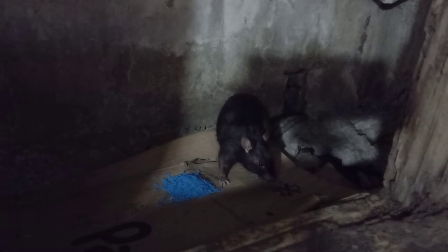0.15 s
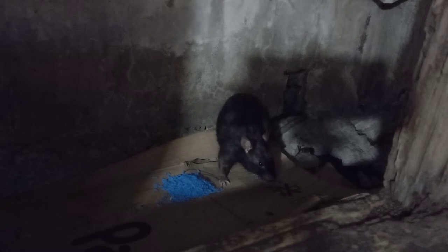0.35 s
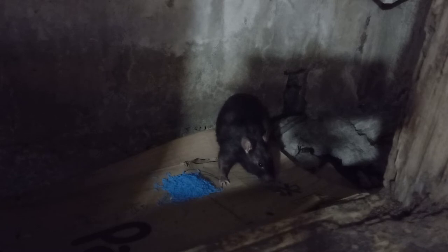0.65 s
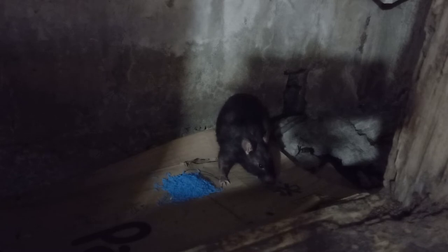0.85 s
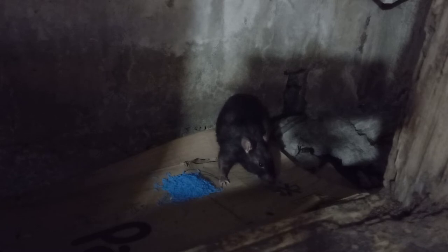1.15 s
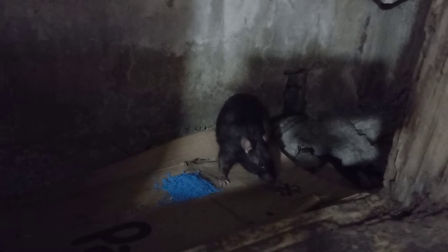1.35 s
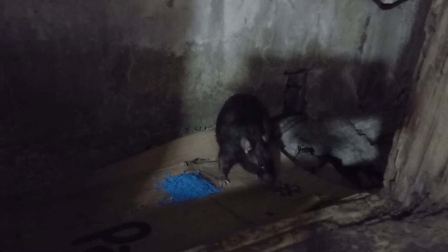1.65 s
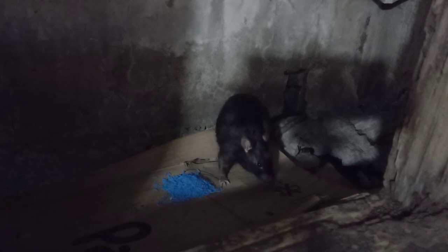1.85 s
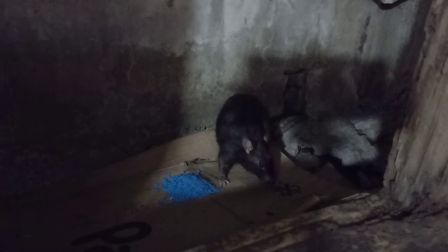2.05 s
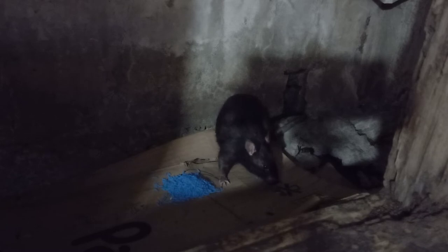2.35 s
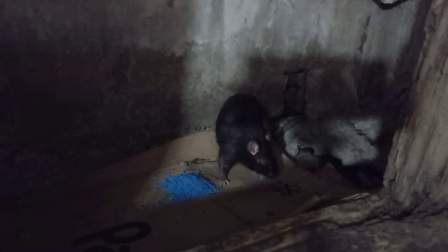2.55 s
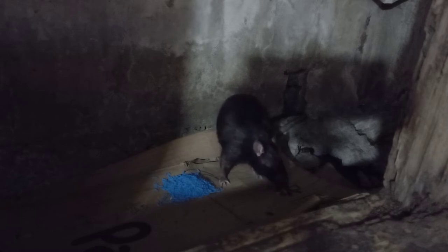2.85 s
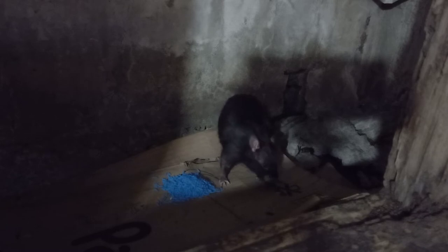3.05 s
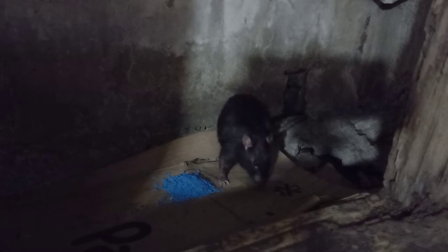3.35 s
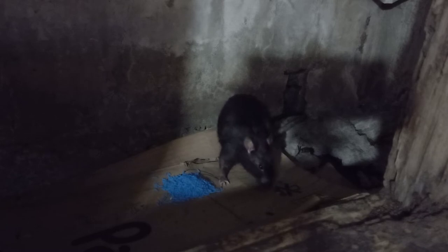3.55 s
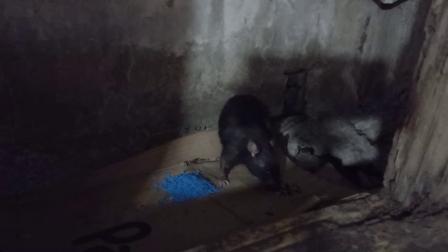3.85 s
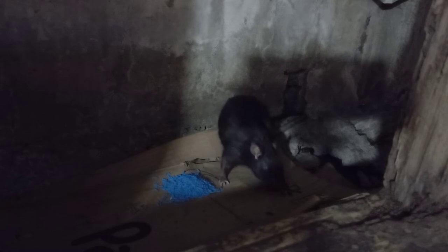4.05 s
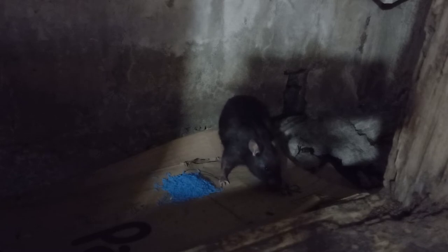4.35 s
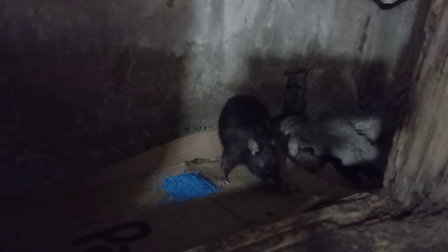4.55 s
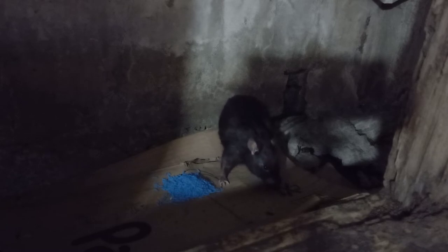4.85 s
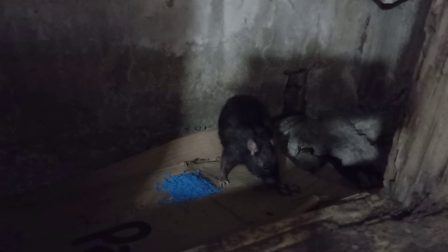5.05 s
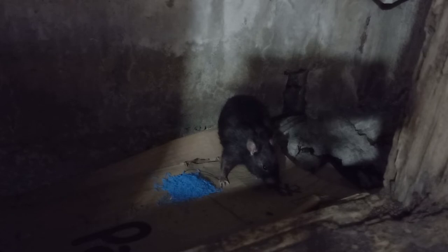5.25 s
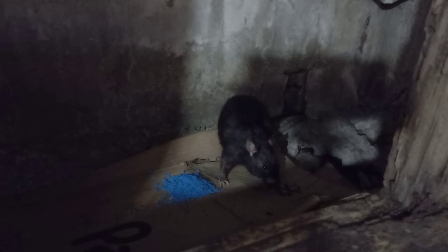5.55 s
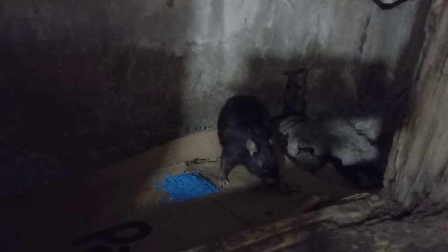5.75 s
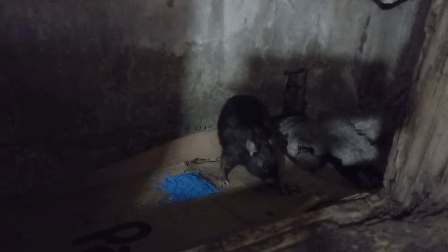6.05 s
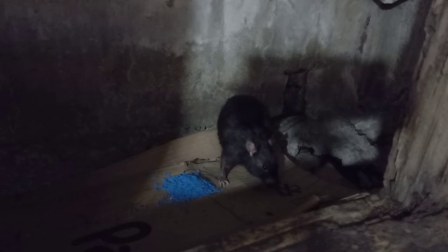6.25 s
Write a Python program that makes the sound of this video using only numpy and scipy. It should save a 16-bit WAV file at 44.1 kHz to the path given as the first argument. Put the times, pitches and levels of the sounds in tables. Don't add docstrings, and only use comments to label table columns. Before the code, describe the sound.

A steady low mains hum with buzzing overtones, wavering fan and shaft tones, and dull rumble through the wall fill a bare indoor corner for about six and a half seconds, with faint airy hiss. At the very start comes a muffled bump, then a small scrape of teeth and one distant rubbing squeak around 0.1 seconds, swelling, slipping and fading by about 0.4. A rat close by, slightly right, cracks a pellet at 0.5, then sharply at 1.5 and 1.6, and more softly at 2.0 and 2.2. Tiny paired nibbling clicks continue from 2.3 to 5. Soft far bumps fall near 0.5, 0.9, 2.8, 3.1 and 4.0; a heavy deep boom with a sliding rustle lands at 5.15. Another crack comes at 5.4, a dull bump at 5.8, a bright snap at 6.0 and a lesser one at 6.2, each with short echo.

```python
import sys
import numpy as np
from scipy import signal
from scipy.fft import rfft, irfft, next_fast_len
from scipy.io import wavfile
from scipy.ndimage import uniform_filter1d, map_coordinates

SR = 44100
rng = np.random.default_rng(int(sys.argv[2]) if len(sys.argv) > 2 else 0)


def amplitude_ratio(level_db):
    exponent = np.asarray(level_db, float) / 20
    return 10 ** exponent


def output_pcm(signal):
    pcm = np.clip(np.atleast_2d(signal).T, -1, 1) * 32767
    wavfile.write(sys.argv[1], SR, np.round(pcm).astype(np.int16))


N = 282240


def unit(x):
    return x / np.sqrt(np.mean(x ** 2) + 1e-20)


def along(points, hz):
    f, v = np.transpose(points)
    return np.interp(np.log(hz + 1), np.log(f + 1), v)


def wobble(rate_hz):
    knots = rng.standard_normal(int(N * rate_hz / SR) + 4)
    return map_coordinates(knots, [np.arange(N) * rate_hz / SR])


def filtered(x, response):
    n = x.shape[-1]
    m = next_fast_len(n + 4096)
    return irfft(rfft(x, m) * response(np.fft.rfftfreq(m, 1 / SR)), m)[..., :n]


def band(hz, width_hz):
    return lambda f: 1j * f * width_hz / (hz * hz - f * f + 1j * f * width_hz)


def add(track, start_s, sound):
    at = max(round(start_s * SR), 0)
    track[..., at:at + sound.shape[-1]] += sound[..., :track.shape[-1] - at]


def tail(decays, length_s):
    noise = rng.standard_normal((2, int(length_s * SR)))
    hz, t, z = signal.stft(noise, SR, nperseg=128)
    decay = amplitude_ratio(-60 * t / along(decays, hz)[:, None])
    x = signal.istft(z * decay, SR, nperseg=128)[1]
    return x / np.linalg.norm(x[0])


def tones(rows):
    hz, db, pan_db, lead = np.transpose(rows)
    m = 1 << 19
    z = np.zeros((2, m // 2 + 1), complex)
    side = np.array([[.5], [-.5]])
    phase = 2 * np.pi * rng.random(len(hz))
    mean_power = np.mean(amplitude_ratio(2 * side * pan_db), axis=0)
    share = amplitude_ratio(side * pan_db) / np.sqrt(mean_power)
    bins = np.round(hz * m / SR).astype(int)
    z[:, bins] = amplitude_ratio(db) * share * np.exp(1j * (phase + side * lead))
    return irfft(z, m)[:, :N] * m / np.sqrt(2)


def series(hz, count, levels, spread_db, apart):
    f = hz * np.arange(1, count + 1)
    u = rng.standard_normal((count, 3))
    db = along(levels, f) + spread_db * u[:, 0]
    return np.array([f, db, 5 * apart * u[:, 1], 2 * apart * u[:, 2]]).T


def hum():
    # order, rms level/dB, left-right/dB, left lead/rad
    buzz = [(2, -42, -1, 0.0), (6, -48, 2, 0.5), (10, -64, 10, 2.1), (14, -69, 2, 2.2),
            (18, -66, -11, -1.2), (22, -60, 2, -3.0), (26, -62, 6, -1.2), (30, -71, 14, -0.9),
            (34, -71, 5, 1.9), (38, -73, 6, 1.0), (42, -82, 4, -1.8), (50, -81, -8, -0.5),
            (54, -81, -7, 2.1), (70, -82, 9, 0.3)]
    # order, rms level/dB, left-right/dB, left lead/rad
    winding = [(21, -71, 1, 2.7), (25, -75, 11, -0.9), (27, -76, 1, 0.7), (29, -78, 6, -2.7),
               (35, -79, -3, -2.7)]
    # f/Hz, rms level/dB
    faint_levels = [(600, -84), (2000, -85), (3100, -89), (3550, -102), (4200, -91), (6000, -101),
                    (8000, -106), (9000, -130)]
    mains_hz = 59.946
    strong = np.array([(round(k) * mains_hz, db + k / 28, pan_db, lead)
                       for k, db, pan_db, lead in [*buzz, *winding]])
    faint = series(mains_hz, count=150, levels=faint_levels, spread_db=3, apart=1)
    low = tones(strong[:2])
    high = tones(np.vstack([faint, strong[2:]]))
    turn = 2 * np.pi * mains_hz / 8 * np.arange(N) / SR
    throb = 1 + .2 * np.cos(turn) + .08 * np.cos(2 * turn + 1)
    return low * amplitude_ratio(.3 * wobble(2.5)) + high * throb * amplitude_ratio(0.9 * wobble(5))


def motors():
    # f/Hz, rms level/dB, left-right/dB, left lead/rad
    shafts = [(55.5, -72, -2, 0.0), (56.9, -64, 1, 0.1), (58.5, -68, 1, 0.1), (65.5, -60, 1, 0.1),
              (99.0, -60, -1, -0.1), (111.6, -53, 0, 0.0), (287.7, -60, 0, 0.2), (425.8, -68, -2, -0.5),
              (444.0, -66, 0, -0.4), (814.4, -74, -1, -1.4), (872.6, -77, 0, -2.8), (930.7, -77, -4, 3.0),
              (1218.0, -71, 0, -0.9), (1276.0, -73, -7, -0.3)]
    # f/Hz, rms level/dB
    blade_levels = [(40, -80), (90, -68), (170, -66), (350, -68), (450, -69), (520, -69), (650, -78),
                    (800, -84), (1000, -100)]
    unsteady = sum(tones([row]) * amplitude_ratio(0.76 * wobble(1.63)) for row in shafts[:7])
    steady = tones(shafts[7:])
    blades = tones(series(18.506, count=50, levels=blade_levels, spread_db=2.5, apart=.25))
    return unsteady + steady + blades * amplitude_ratio(1.5 * wobble(1.5))


def air():
    # f/Hz, density/dB per Hz
    rumble_colour = [(25, -46), (45, -31), (56, -7.5), (70, 1), (110, 1), (135, -2.5), (240, -3.5),
                     (290, -9.5), (360, -4.5), (520, -9.5), (650, -19), (900, -34), (1500, -51)]
    # f/Hz, density/dB per Hz
    air_colour = [(25, -23), (50, -22), (70, 7), (300, -1.5), (600, -3), (950, -3), (1450, -3), (1700, -9),
                  (2100, -10), (2600, -20), (6000, -23.5), (14500, -28.5), (15350, -26), (15600, -66)]
    rumble = amplitude_ratio(-48) * unit(filtered(rng.standard_normal(N), lambda f: amplitude_ratio(along(rumble_colour, f))))
    room = amplitude_ratio(-55.0) * unit(filtered(rng.standard_normal((2, N)), lambda f: amplitude_ratio(along(air_colour, f))))
    hiss = filtered(room, lambda f: np.clip(f / 2500 - 1, 0, 1))
    rumble = rumble * amplitude_ratio([[-.3], [.3]] + .8 * wobble(3))
    murmur = (room - hiss) * amplitude_ratio(.9 * wobble(6))
    return rumble + murmur + hiss * amplitude_ratio(.4 * wobble(8) + .3 * wobble(1.2))


def held(x, envelope):
    return x * envelope / np.sqrt(np.mean((x * envelope) ** 2) / np.mean(envelope ** 2))


def swell(t, rise_s, t60_s):
    shape = np.minimum(t / rise_s, 1) ** 2 * amplitude_ratio(-60 * np.maximum(t - rise_s, 0) / t60_s)
    lumps = unit(uniform_filter1d(rng.standard_normal(len(t)), 300))
    return shape * amplitude_ratio(1.2 * lumps)


def rustle(envelope):
    colour = lambda f: amplitude_ratio(along([(1500, -15), (2800, -9.5), (6000, 2.0), (10000, 0.0), (15000, -7)], f))
    return held(filtered(rng.standard_normal((2, len(envelope))), colour), envelope)


def bumps():
    # t/s, rms level/dB, centre f/Hz, rise/s, t60/s
    blows = [(.018, -45.5, 940, 0.0057, 0.62), (.495, -50, 1130, 0.012, 0.51), (.94, -44, 580, 0.039, 0.37),
             (0.954, -58.5, 1670, 0.033, 0.42), (2.84, -50.5, 605, 0.018, 0.29),
             (3.1, -50, 596, 0.023, 0.22), (4.0, -47.5, 835, 0.037, 0.37), (5.145, -41, 490, 0.012, 0.29),
             (5.156, -51, 2160, 0.029, 0.29), (5.243, -52.5, 1410, .015, 0.16), (5.25, -49, 620, 0.02, 0.4),
             (5.835, -49.5, 960, 0.028, 0.59)]
    # t/s, rms level/dB, t60/s
    scuffs = [
        (0.015, -64, .5),
        (4.005, -61, .35),
        (5.161, -49, 0.33),
        (5.242, -69, .23),
        (5.855, -75, .3),
    ]
    # t/s, level/dB, f/Hz, t60/s
    thuds = [
        (.97, -43, 257, 0.3),
        (2.851, -45.5, 239, 0.25),
        (3.118, -43, 263, 0.18),
        (5.157, -27.5, 77, 0.22),
        (5.165, -43.5, 172.7, 0.7),
    ]
    out, t = np.zeros((2, N)), np.arange(SR // 2) / SR
    for s, db, hz, rise_s, t60_s in blows:
        envelope = swell(t, rise_s, t60_s)
        shared, own = rng.standard_normal(len(t)), rng.standard_normal((2, len(t)))
        wall = band(hz, 0.91 * hz)
        body = filtered(0.86 * shared + own, lambda f: wall(f) ** 2)
        add(out, s, amplitude_ratio(db) * (held(body, envelope) + amplitude_ratio(-34) * rustle(envelope)))
    for s, db, t60_s in scuffs:
        add(out, s, amplitude_ratio(db) * rustle(swell(t, .02, t60_s)))
    for s, db, hz, t60_s in thuds:
        wander = 1.98 * np.cumsum(unit(rng.standard_normal(len(t)))) * np.sqrt(hz / SR)
        ring = np.sin(2 * np.pi * hz * t + wander)
        add(out, s, amplitude_ratio(db - 60 * t / t60_s) * np.minimum(t / 0.013, 1) * ring[None])
    return out


def bites():
    # t/s, peak level/dB, tooth ring over the rest/dB, jaw knock/dB
    cracks = [(0.0192, -53, -2, 3), (0.5199, -35.5, 3, -18), (1.4687, -30.5, 9.5, -9),
              (1.635, -32.5, 16, -4.5), (2.0234, -39, -1.5, -4.5), (2.217, -51, -2, 3),
              (2.2412, -44, 9, -9), (3.255, -53.5, -3, 8), (3.8087, -46, -0.5, -16),
              (5.435, -39, -1.5, -10), (6.006, -31, 2.5, -26), (6.2268, -41, -3, -12)]
    # t/s, peak level/dB
    nibbles = [(.3371, -62), (2.2843, -56), (2.5037, -61), (2.5252, -62), (2.724, -53.5), (2.7616, -53.5),
               (3.034, -51), (3.0724, -54), (3.5274, -61), (3.5486, -51.5), (3.7888, -57), (4.136, -56),
               (4.9147, -56), (4.942, -54), (4.9631, -61), (6.003, -65)]
    # t/s, peak level/dB, part levels/dB, crumble/s
    scrape = (0.11, -41.5, (-27, -1, 0.5, 4), 0.13)
    # f/Hz, width/Hz
    resonances = [
        (1350, 740),
        (4300, 3200),
        (8300, 3400),
        (13000, 5100),
    ]
    # f/Hz, t60/s
    corner = [(1000, 0.36), (4000, 0.26), (9000, 0.089), (15000, 0.46)]
    events = [scrape]
    events += [(s, db, (jaw_db, -ring_db, 0, -2.5 - 0.65 * ring_db), 0.0061) for s, db, ring_db, jaw_db in cracks]
    events += [(s, db, (-13, 0, 3.5, -6), 0.016) for s, db in nibbles]
    out, t = np.zeros((2, N)), np.arange(SR // 8) / SR
    for s, db, levels_db, crumble_s in events:
        crumble_s = max(crumble_s, .001)
        grit = rng.standard_normal((2, len(t))) * amplitude_ratio(4.3 * rng.standard_normal(len(t)))
        grit = np.array([0.73 * grit[1] + 0.86 * grit[0], grit[1]])
        burst = grit * (amplitude_ratio(-60 * t / crumble_s) + amplitude_ratio(-8 - 60 * t / 0.035))
        burst[:, 0] = 0.038 / crumble_s
        snap = np.zeros_like(burst)
        for k, (part_db, (hz, width_hz)) in enumerate(zip(levels_db, resonances)):
            part = filtered(burst, lambda f: band(hz, width_hz)(f) ** 2)
            snap += (-1) ** k * amplitude_ratio(db + 12.5 + part_db) * part / np.linalg.norm(part[1, :SR // 300])
        shade = filtered(snap[0], lambda f: amplitude_ratio(along([(2000, 5.0), (4000, -3.0), (8000, -9)], f)))
        add(out, s, np.array([shade, np.roll(snap[1], 4)]))
        echo = signal.fftconvolve(snap[1:], tail(corner, .25), axes=1)
        add(out, s + 0.0016, amplitude_ratio([[-8], [-4.5]]) * echo)
    return out


def squeak():
    # level under full load/dB, growth with load, level in the last drag/dB
    overtones = [
        (-21, .9, -7.5),
        (-22, 2.6, -28),
    ]
    # f/Hz, t60/s
    hall = [(300, 0.45), (1100, 0.57), (2200, 0.49), (8000, 0.16)]
    start_s, full_s, let_go_s, fade_s, fade_t60_s = .036, .148, .164, .215, .45
    start_hz, held_hz, catch_s, sag_hz_per_s = 1015, 1093, .022, 420
    start_db, full_db, drag_db, ease_db = -51, -36.5, -48.5, -2.5
    t = np.arange(N) / SR
    since_s = t - start_s
    hz = held_hz - (held_hz - start_hz) * np.exp(-np.maximum(since_s, 0) / catch_s)
    hz = hz - sag_hz_per_s * np.clip(t - full_s, 0, .055)
    load = np.clip(since_s / (full_s - start_s), 0, 1)
    load_db = (start_db - full_db) * (1 - load ** 1.4) + np.interp(t, [full_s, let_go_s], [0, ease_db])
    grip = np.clip(since_s / 0.0064, 0, 1) * np.clip((let_go_s - t) / 0.005 + 1, 0, 1)
    drag = np.clip((t - full_s) / 0.0072, 0, 1) * amplitude_ratio(-60 * np.maximum(t - fade_s, 0) / fade_t60_s)
    phase = 2 * np.pi * np.cumsum(hz * (1 + 0.0032 * wobble(72))) / SR
    whine = np.zeros(N)
    for k, (db, growth, last_db) in enumerate([(0, 0.89, 0), *overtones], 1):
        level = grip * amplitude_ratio(full_db + db + growth * load_db) + drag ** k * amplitude_ratio(drag_db + last_db)
        whine += level * np.sin(k * phase)
    return whine + amplitude_ratio(-8) * signal.fftconvolve(whine[None], tail(hall, .6), axes=1)[:, :N]


def scene():
    # f/Hz, gain/dB
    ports = [(2800, 1), (3150, 4), (3550, -3), (3900, 1.5), (4250, 2.5), (4900, -0.5), (6600, -4),
             (7900, -0.5), (9200, -4), (15300, -7), (16200, -18)]
    housing = lambda f: amplitude_ratio(along(ports, f))
    low_cut = lambda f: 1 / np.sqrt(1 + (52 / (f + 1)) ** 8)
    airborne = air() + filtered(bumps(), low_cut) + bites()
    return hum() + motors() + filtered(airborne, housing) + squeak()


def low_pass(x):
    return signal.sosfilt(signal.butter(12, 16480, fs=SR, output="sos"), x)


def record(dry):
    return low_pass(dry)


dry = scene()
out = record(dry)
output_pcm(out)
```